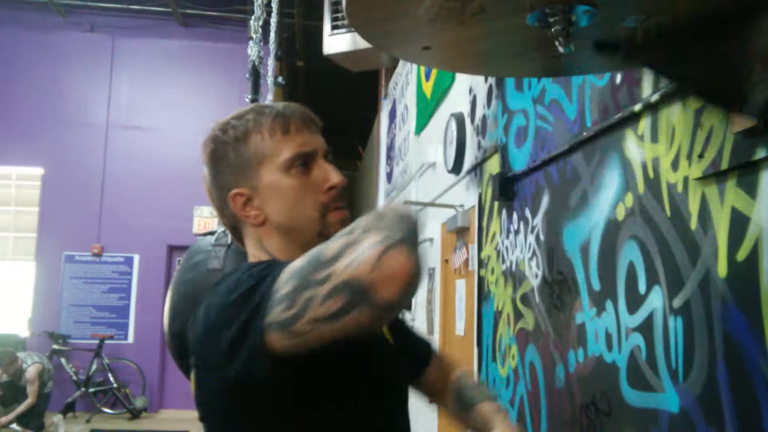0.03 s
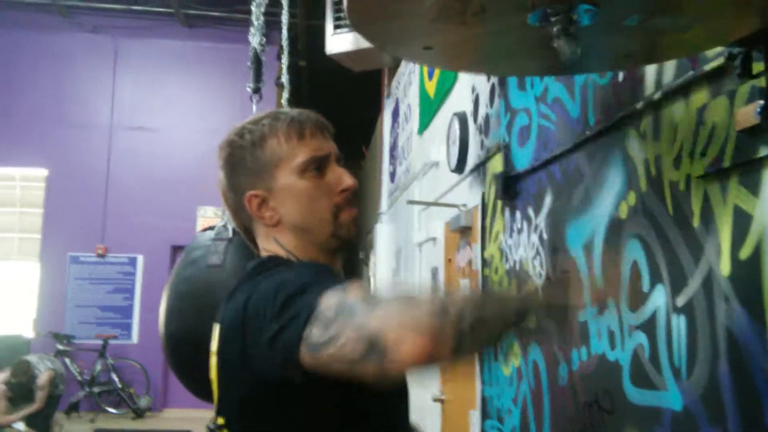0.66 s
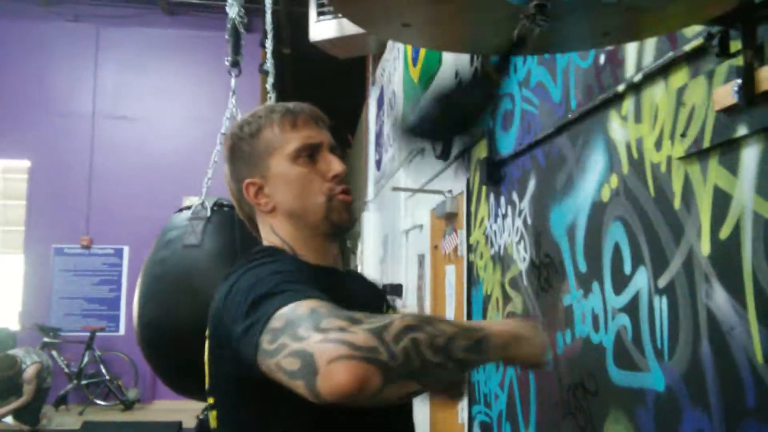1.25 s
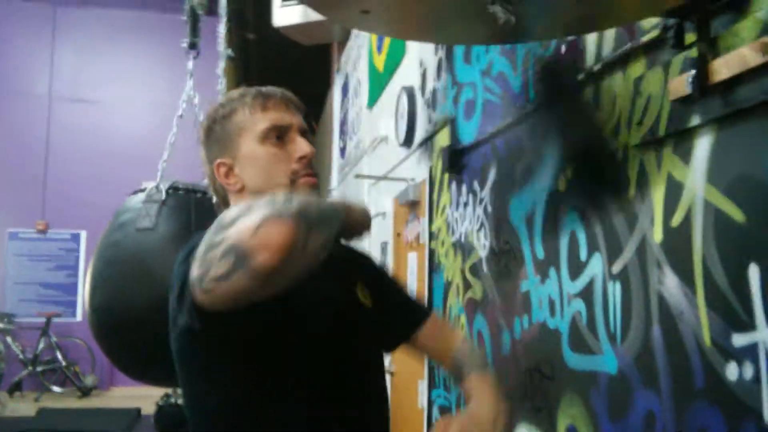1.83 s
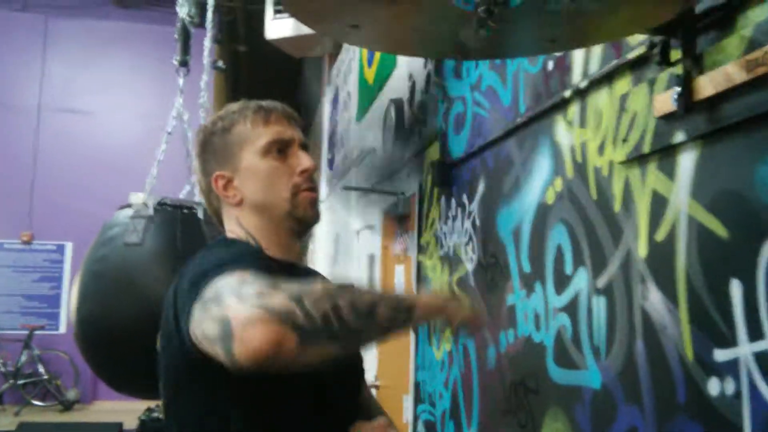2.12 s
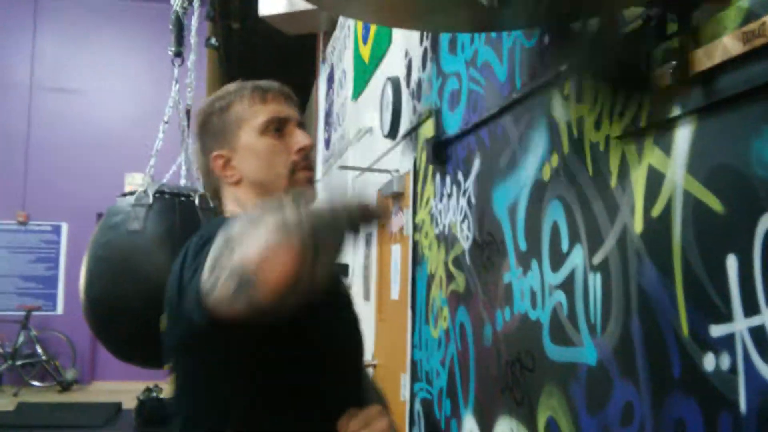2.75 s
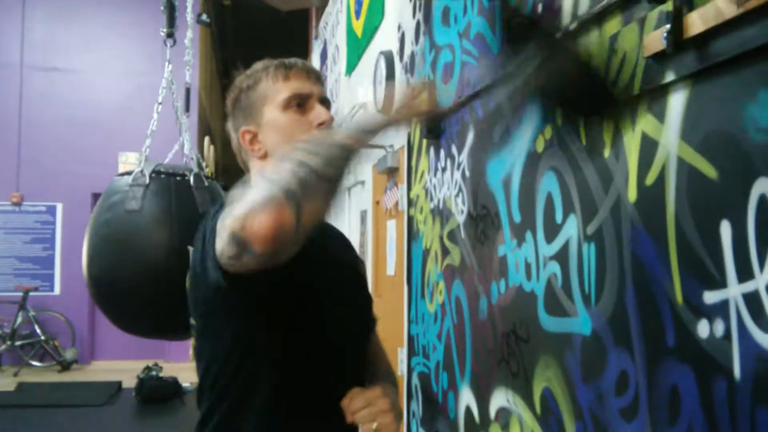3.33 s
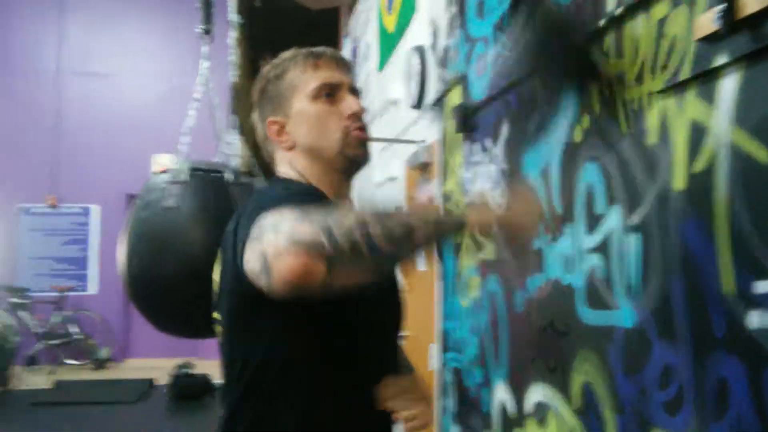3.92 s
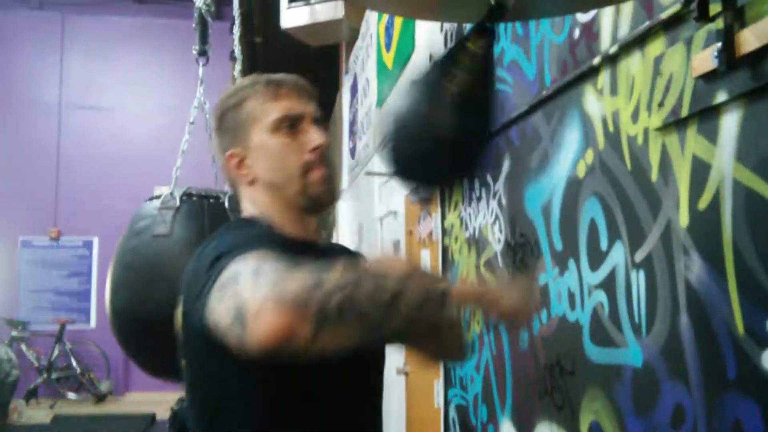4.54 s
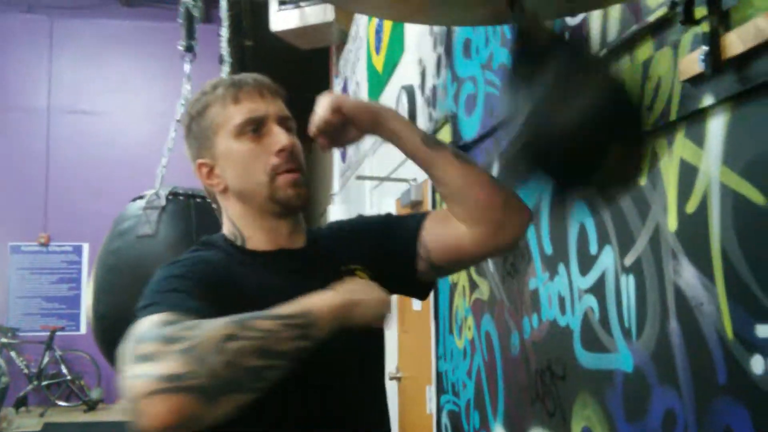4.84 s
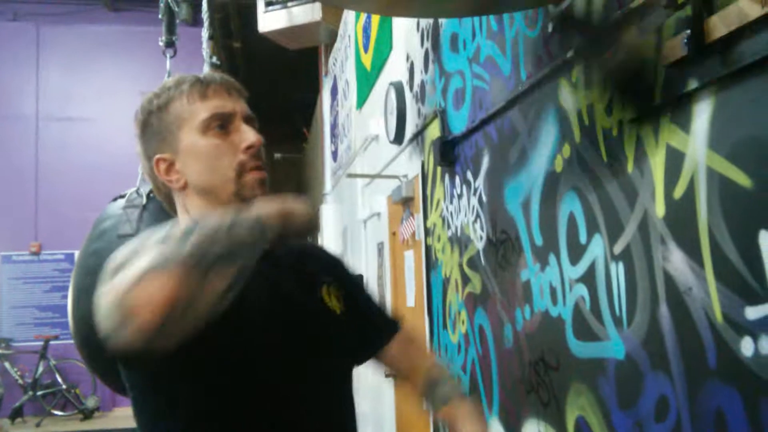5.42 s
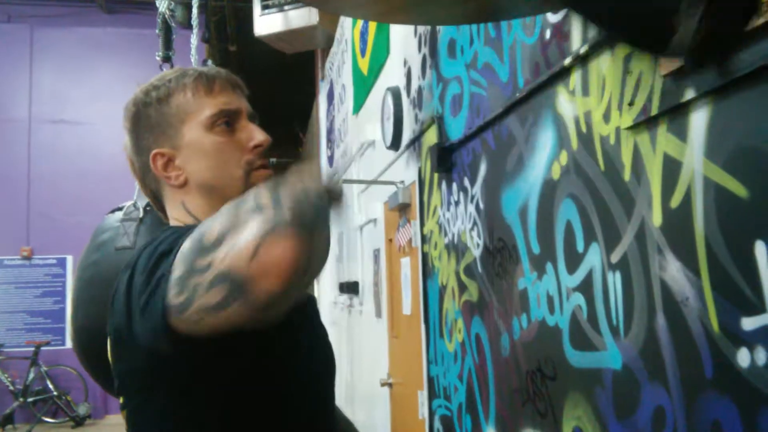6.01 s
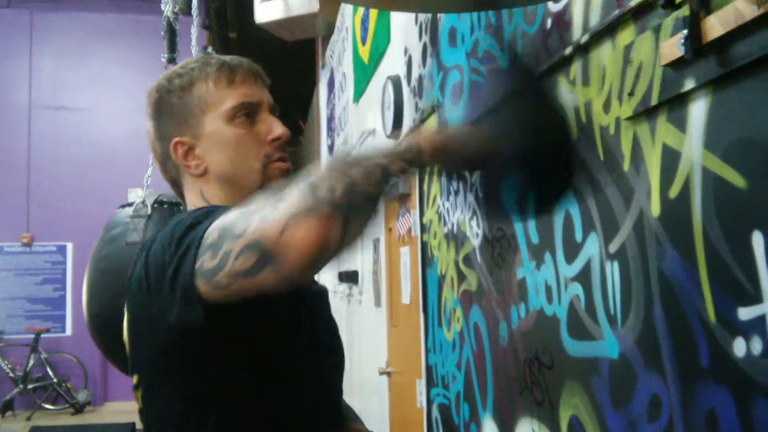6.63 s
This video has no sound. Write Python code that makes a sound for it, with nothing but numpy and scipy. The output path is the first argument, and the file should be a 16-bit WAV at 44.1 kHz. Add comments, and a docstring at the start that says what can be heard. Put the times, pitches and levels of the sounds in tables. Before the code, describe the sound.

Rapid leather slaps and wooden thumps of a speed bag in a gym, its metal swivel clinking and squeaking, with one brief lull.

```python
"""A speed bag is worked about twice a second under its wooden platform in a gym. The fist slaps the
leather, the bag slams into the back of the board, squeaks through on its swivel, rebounds off the front
and taps the back again. Each contact clacks, ticks the steel and booms the board; the fittings buzz on
and the hall rings out over a steady rumble. In the first half the hardest blows choke the microphone.
About four and a half seconds in, the bag swings free for a moment; then the punching picks up again."""
import sys
import numpy as np
from scipy import signal
from scipy.fft import rfft, irfft
from scipy.io import wavfile
from scipy.ndimage import uniform_filter1d

SR = 44100
rng = np.random.default_rng(int(sys.argv[2]) if len(sys.argv) > 2 else 0)


def unload_audio(sound):
    """Save the sound as a 16-bit wav file, at the path given as the first command line argument."""
    columns = np.transpose(np.atleast_2d(sound))
    # keep every value between -1 and 1, then stretch to whole-number steps
    steps = np.round(np.clip(columns, -1, 1) * 32767)
    wavfile.write(sys.argv[1], SR, steps.astype(np.int16))


N = 294147
TIME = np.arange(N) / SR

# Cue sheets for the four contacts of a stroke, each with trims against a usual contact of its kind:
# t/s, stretch of its delays/x, boom/dB, clack/dB, buzz/dB, metal/dB
PUNCHES = [(0.204, 1.1, 3.5, 1, 5, 2), (0.655, 0.98, 1, 2.5, -3, 1), (1.115, 0.97, 2, 3, 6.5, 6.5),
           (1.593, .7, -3, 2, 0, -4), (2.058, 0.99, 2.5, -1.5, 3.5, 0.5), (2.4946, 1.25, -0.5, 3.5, -8, -2),
           (2.958, 0.93, -9, 2, -10, 3), (3.431, 0.83, 1, 0.5, -3, -4.5), (3.905, .75, 0, -1, -5, 1),
           (4.437, .9, -6.5, -1, -19, 1), (5.184, 0.85, -2, 0.5, 0, -1), (5.670, 1.34, -3, 2.5, 3, 5.5),
           (6.188, 1.11, -2, -2.5, 4, 2)]
SLAMS = [(0.248, .7, -0.1, -2.5, 1, 0.5), (0.699, 0.93, 2.3, 1.5, -0.5, 1), (1.159, 1.16, 2.4, 3, 1.5, 1),
         (1.637, 0.85, 0.2, -1.5, -2, -5.5), (2.105, 0.84, 1.1, 2.5, -3, -2),
         (2.538, 1.2, 3.2, 1, 0.5, -1.5), (3.007, 0.92, 2, 1, -0.5, -0.5), (3.477, 1.22, 2.2, 3, 4.5, 4),
         (3.945, 1.05, -2, 3, -6, -3.5), (4.479, 1.23, -1.2, 1, -2.5, -3),
         (5.2325, 0.78, 1.6, -2, -1.5, -8.5), (5.734, 0.79, 0.42, 3.5, 1.5, 3),
         (6.2355, 1.25, 0.74, 0, 1.5, -6)]
REBOUNDS = [(-0.038, 0.96, 2.5, -4, -2, -2.5), (0.403, 1.03, -3, 0, -2.5, 1.5),
            (0.8556, 0.97, -1, -0.5, 1, 1), (1.321, 1.04, 1, 0, -1, 0), (1.793, 1.02, -1, -0.5, -9, -1.5),
            (2.252, 0.98, 2.5, 0, 4.5, 0.5), (2.691, 0.97, -1.5, 0.5, 3, 0), (3.165, 1.08, 0.5, 0, 2.5, -2),
            (3.642, .95, -1.5, -2, 1.5, -1.5), (4.111, 1.5, -6, -11, -15, -10),
            (4.528, .9, -3, -0.5, -11, -13), (5.385, 0.95, -0.5, 0, 0.5, 1), (5.880, 1.63, 0, -2, 2, -4),
            (6.3967, 1.02, 0, 1, 5, -5.5)]
TAPS = [(0.115, 1, -9, -2, -1, 2), (0.5685, 0.97, -5, -1, -4, 3.5), (1.0284, 0.96, -0.5, -0.5, 0, 3),
        (1.496, 0.99, -1, 2.5, 0, 2.5), (1.961, 1, 0, 3, -5, 1), (2.412, 0.94, 1.5, 2.5, 7.5, 1.5),
        (2.861, 1, -1, 1.5, -7, 4), (3.339, 1, 1, 1.5, 7, 0), (3.825, 1, -0.5, -2, 8.5, 1),
        (4.341, 0.9, -4, -6.5, -15, -5.5), (4.722, 1, -9.5, -7, -18, -11),
        (5.029, 0.77, -13, -20, -24, -16.5), (5.542, 0.87, -0.5, 3.5, 4, 0.5),
        (6.086, 0.53, -5, 0, -13, -2.5), (6.575, 0.65, 0, -2, -9, -2)]
# the cue sheet for each kind of contact
CONTACTS = {"punch": PUNCHES, "slam": SLAMS, "rebound": REBOUNDS, "tap": TAPS}
# how each kind shakes the platform: unstretched delay/s, boom/dB, frame buzz/dB, metal sizzle/dB
SHAKES = {"punch": [(0.004, -16.5, -25.5, -60)], "slam": [(0.001, -10, -19, -18)],
          "rebound": [(-0.022, -22.5, -31, -38), (0.002, -15, -26, -22.5)],
          "tap": [(0.001, -23.5, -38.5, -34.5)]}
# its clacks of leather on wood: unstretched delay/s, wooden body/dB, slap/dB, usual spot pitch/Hz
CLACKS = {"punch": [(0, -27, -23, 1920), (0.013, -17, -13.5, 1210)], "slam": [(-0.001, -18.5, -11, 1565),
          (0.045, -19, -18, 1110)], "rebound": [(-0.0245, -19, -10.5, 1700), (-0.001, -15.5, -10, 2520),
          (0.038, -15, -11.5, 2140)], "tap": [(0, -25.5, -19, 2150), (0.022, -27, -27.5, 1150)]}
# its steel contacts in the swivel: unstretched delay/s, level/dB
TICKS = {"punch": [(0, -18), (0.0145, -16.5)], "slam": [(-0.008, -22), (0, -3.5)],
         "rebound": [(-0.045, -21), (-0.022, -8), (0, -8.5), (0.037, -16.5), (0.113, -26)],
         "tap": [(0, -11.5), (0.023, -28)]}
# the hanger knocks and clinks as the bag swings free: t/s, wooden body/dB, slap/dB, f/Hz, steel/dB
HANGER_KNOCKS = [(2.6127, -24, -14, 1880, -30), (3.093, -21.5, -14.5, 1710, -25),
                 (4.047, -23, -19.5, 2020, -31), (4.168, -18.5, -30, 1150, -24),
                 (4.225, -31.5, -33, 1770, -27), (4.258, -44, -44, 1810, -25.5),
                 (4.686, -30, -23.5, 1870, -23), (4.887, -48, -44, 1790, -30), (4.95, -36, -36, 1380, -32),
                 (5.335, -30, -30, 3400, -16), (6.039, -35, -23.5, 2500, -14)]
# swivel squeaks, mostly just before a rebound: t/s, length/s, start f/Hz, end f/Hz, level/dB
SQUEAKS = [(0.208, 0.0092, 3750, 3860, -20.5), (0.339, 0.037, 3196, 3310, -17.5),
           (0.797, 0.027, 3360, 3320, -17), (1.271, 0.037, 2985, 3560, -17), (1.72, 0.024, 3110, 3300, -22),
           (2.197, 0.036, 2910, 3330, -19), (2.647, .023, 2990, 3370, -14),
           (3.103, 0.036, 3400, 2910, -18.5), (3.909, .017, 3955, 4160, -25.5),
           (4.095, .014, 3350, 3470, -20.5), (4.273, 0.026, 1290, 1190, -32),
           (4.721, 0.012, 3560, 3640, -30.5), (4.855, 0.029, 1720, 1860, -36.5),
           (5.322, .018, 3370, 3580, -20), (5.442, 0.035, 3250, 2930, -20),
           (6.346, 0.027, 3260, 3460, -22.5), (6.435, 0.0163, 3460, 3130, -25)]
# the frame left ringing hollowly between strokes: t/s, f/Hz, level/dB, t60/s
HOLLOW_RINGS = [(1.033, 687, -27, 0.24), (1.523, 670, -27, 0.18), (2.884, 685, -28, 0.22),
                (3.71, 573, -24.5, 0.46), (4.365, 673, -19.5, 0.057), (4.722, 668, -19, 0.077)]
# blows that choke the microphone: t/s, hold/s
CHOKES = [(0.253, 0.014), (0.7005, 0.0041), (1.162, 0.00079), (3.0097, 0.013)]
# low modes of platform and bag: f/Hz, level/dB, t60/s
BOARD_MODES = [(55.6, -8.5, 0.26), (75.8, -7, 0.44), (97.4, 3, 0.24), (116, -15.5, 0.11), (138, -5.5, 0.39),
               (168.7, -4, 0.15), (186, -5.5, 0.097), (267, -22, 0.13)]
# resonances of the wooden frame: f/Hz, width/Hz, level/dB
FRAME_MODES = [(160, 62, -2), (284, 188, -4.5), (514, 55, 0), (557, 37, 2.5), (660, 41, 4.5),
               (870, 66, 0.5), (1002, 57, 1), (1245, 118, -4)]
# tone curves of leather slap, steel and room tone: f/Hz, level/dB
SLAP_EQ = [(700, -23), (1200, -9), (1600, 3.5), (2100, 2.5), (2600, 1.5), (3500, 1), (4200, -3),
           (5200, -17.5), (7000, -18), (12000, -12)]
METAL_EQ = [(1500, -18), (4000, -15.5), (5800, -13.5), (7500, -10), (9500, -6), (11700, 1.5), (13500, -3),
            (15500, -9.5), (17000, 1)]
ROOM_TONE_EQ = [(25, -19), (50, 10), (100, 11), (200, -3), (400, -4), (1000, -6.5), (2500, -14.5),
                (5500, -35), (12000, -20), (16000, -32)]
# reverb time of the hall: f/Hz, t60/s
HALL_DECAY = [(60, 0.36), (160, 1), (420, 0.36), (1100, 0.43), (3000, 0.71), (7000, 0.32), (14000, 0.19)]


def shake_cues():
    """Every contact shakes the platform: rows of t/s, boom/dB, frame buzz/dB, metal sizzle/dB."""
    return [(s + stretch * delay, boom_db + boom_trim, frame_db + buzz_trim, sizzle_db + metal_trim)
            for kind, rows in CONTACTS.items() for s, stretch, boom_trim, _, buzz_trim, metal_trim in rows
            for delay, boom_db, frame_db, sizzle_db in SHAKES[kind]]


def boom(level_db, spread_db, detune, attack_s):
    """The soft bag loads the board gradually and rings its low modes, a little differently each hit."""
    out, t = np.zeros(N), TIME[:SR // 3]
    hz, mode_db, t60 = np.transpose(BOARD_MODES)[:, :, None]
    envelope = decay(t, t60) * (1 - np.exp(-t / attack_s))
    for s, db, *_ in shake_cues():
        louder, higher, polarity = rng.standard_normal((3, len(BOARD_MODES), 1))
        gains = np.sign(polarity) * from_db(mode_db + spread_db * louder)
        modes = gains * envelope * np.sin(2 * np.pi * hz * (1 + detune * higher) * t)
        add(out, s, from_db(db + level_db) * unit_rms(modes.sum(axis=0)))
    return out


def shudder(level_db, t60):
    """After each boom the platform goes on rumbling on its brackets."""
    s, db, _, _ = np.transpose(shake_cues())
    rumble = band_noise(110, 195)
    levelled = rumble / np.sqrt(uniform_filter1d(rumble ** 2, size=900) + 1e-12)
    return bursts(s + 0.011, db + level_db, t60=t60, rise=0.014) * levelled


def clack_cues(spread_octaves=0.24):
    """The bag never lands on quite the same spot: rows of t/s, wooden body/dB, slap/dB, f/Hz."""
    cues = [(s + stretch * delay, body_db + trim, slap_db + trim,
             hz * 2 ** (spread_octaves * rng.uniform(-1, 1)))
            for kind, rows in CONTACTS.items() for s, stretch, _, trim, _, _ in rows
            for delay, body_db, slap_db, hz in CLACKS[kind]]
    return cues + [knock[:4] for knock in HANGER_KNOCKS]


def clacks(wood_db, ring_db):
    """Leather lands in a flurry of tiny slaps that knock the frame and ring the struck spot."""
    s, body_db, slap_db, pitch_hz = np.transpose(clack_cues())
    knock = bursts(s - 0.001, body_db + wood_db, t60=0.096, rise=0.00091)
    knock *= chatter(per_s=1400, uneven_db=2.5, patchy_db=6.0)
    slap = bursts(s, slap_db, t60=0.057, rise=0.0014) * chatter(per_s=1500, uneven_db=4.0, patchy_db=4.0)
    out = wooden_frame(knock) + eq(slap, SLAP_EQ)
    for start, db, hz in zip(s, slap_db, pitch_hz):
        add(out, start, from_db(db + ring_db) * spot_ring(hz, width_hz=670, scuffle_t60=0.056))
    return out


def fists(level_db, wood_db, slap_db):
    """The fist sinks into the bag: a softer, longer slap."""
    s, _, _, trim_db, _, _ = np.transpose(PUNCHES)
    force = bursts(s, level_db + trim_db, t60=0.12, rise=0.00051)
    force *= chatter(per_s=800, uneven_db=2.5, patchy_db=1.5)
    return from_db(wood_db) * wooden_frame(force) + from_db(slap_db) * eq(force, SLAP_EQ)


def wooden_frame(force):
    """The frame gives a force its woody body: a few broad resonances of alternating polarity."""
    t = TIME[:4096]
    modes = [(-1) ** k * from_db(db) * width * np.exp(-np.pi * width * t) * np.cos(2 * np.pi * hz * t)
             for k, (hz, width, db) in enumerate(FRAME_MODES)]
    return convolve(force, sum(modes))


def spot_ring(hz, width_hz, scuffle_t60):
    """A short scuffle rings one resonance of the struck spot; peak power 1."""
    t = TIME[:2000]
    force = rng.standard_normal(len(t)) * (1 - np.exp(-t / 0.0007)) * decay(t, scuffle_t60)
    radius = np.exp(-np.pi * width_hz / SR)
    ring = signal.lfilter([1], [1, -2 * radius * np.cos(2 * np.pi * hz / SR), radius ** 2], force)
    return ring / np.sqrt(uniform_filter1d(ring ** 2, size=350).max())


def swivel_ticks(click_db, rattle_db):
    """Contacts and hanger knocks jerk the swivel: steel meets steel in a click and a short rattle."""
    cues = [(s + stretch * delay, db + trim)
            for kind, rows in CONTACTS.items() for s, stretch, *_, trim in rows
            for delay, db in TICKS[kind]]
    s, db = np.transpose(cues + [(s, steel_db) for s, *_, steel_db in HANGER_KNOCKS])
    click = bursts(s, db + click_db, t60=0.003, rise=0.0012)
    rattle = bursts(s, db + rattle_db, t60=0.09, rise=0.00039)
    return eq((click + rattle) * chatter(per_s=3100, uneven_db=5.5, patchy_db=7.5), METAL_EQ)


def buzz(wood_db, slap_db, metal_db):
    """After a blow the shaking board keeps its frame and metal fittings chattering."""
    s, _, frame_db, sizzle_db = np.transpose(shake_cues())
    shake = bursts(s + 0.012, frame_db, t60=0.48, rise=0.02)
    sizzle = bursts(s + 0.015, sizzle_db, t60=0.63, rise=0.02)
    wood = wooden_frame(shake * chatter(per_s=200, uneven_db=6.5, patchy_db=5.0))
    slap = eq(shake * chatter(per_s=87, uneven_db=0.0, patchy_db=12.0), SLAP_EQ)
    metal = eq(sizzle * chatter(per_s=770, uneven_db=1.5, patchy_db=1.5), METAL_EQ)
    return from_db(wood_db) * wood + from_db(slap_db) * slap + from_db(metal_db) * metal


def loose_parts(per_s, knock_db, ping_db):
    """While the board shakes, nuts and links knock and ping at random, each at its own pitch."""
    s, _, frame_db, _ = np.transpose(shake_cues())
    shake, out = bursts(s, frame_db, t60=0.81, rise=0.014), np.zeros(N)
    for when, softness, knock_tune, ping_tune in rng.random((int(per_s * N / SR), 4)):
        knock = from_db(knock_db) * spot_ring(550 * 7 ** knock_tune, width_hz=220, scuffle_t60=0.022)
        ping = from_db(ping_db) * spot_ring(9000 + 6500 * ping_tune, width_hz=470, scuffle_t60=0.0082)
        add(out, when * N / SR, shake[int(when * N)] * from_db(-9 * softness) * (knock + ping))
    return out


def swivel_squeaks(level_db, waver, flutter_db, shrill_db):
    """Stick-slip in the swivel gives short, rough glides and sets a shrill steel mode singing."""
    out = np.zeros(N)
    slip, grip = unit_rms(uniform_filter1d(uniform_filter1d(rng.standard_normal((2, N)), 45), 45))
    for s, length, start_hz, end_hz, db in SQUEAKS:
        progress = np.linspace(0, 1, int(length * SR))
        glide_hz = start_hz + (end_hz - start_hz) * progress
        hz = glide_hz * (1 + waver * slip[int(s * SR):][:len(progress)])
        envelope = from_db(db + level_db) * np.sin(np.pi * progress)
        add(out, s, envelope * np.sin(2 * np.pi * np.cumsum(hz) / SR))
    shrill = np.abs(out) * unit_rms(band_noise(14300, 15700))
    return out * flutter(grip, flutter_db) + from_db(shrill_db) * shrill


def hollow_rings(level_db):
    """Between strokes one mode of the frame swells and dies away."""
    out, t = np.zeros(N), TIME[:SR // 3]
    for s, hz, db, t60 in HOLLOW_RINGS:
        envelope = from_db(db + level_db) * (1 - np.exp(-t / 0.0026)) * decay(t, t60)
        add(out, s, envelope * np.sin(2 * np.pi * hz * t))
    return out


def hall(send, onset_s, swing_hz, paths=3):
    """A diffuse tail, each band dying at its own pace; the moving bag keeps shifting the echo paths."""
    t, tails = TIME[:SR], 0
    edges = np.geomspace(35, 18000, 11)
    for low, high in zip(edges, edges[1:]):
        t60 = at_hz(HALL_DECAY, np.sqrt(low * high))
        tails = tails + band_noise(low, high, (paths, SR)) * decay(t, t60)
    tails *= 1 - np.exp(-(t / onset_s) ** 2)
    swing = 2 * np.pi * swing_hz * TIME
    crossfades = [np.sqrt(2 / paths) * np.cos(swing + np.pi * k / paths) for k in range(paths)]
    return sum(convolve(send * fade, tail) for fade, tail in zip(crossfades, tails))


def room_tone(level_db):
    """The steady low rumble of the hall."""
    return from_db(level_db) * eq(rng.standard_normal(N), ROOM_TONE_EQ)


def bursts(times, levels_db, t60, rise):
    """Force envelope of many contacts: each swells and dies (rise, t60 in s), and their powers add."""
    power, t = np.zeros(N), TIME[:int((t60 + rise) * SR)]
    shape = ((1 - np.exp(-(t / rise) ** 2)) * decay(t, t60)) ** 2
    shape /= shape.max()
    for s, db in zip(times, levels_db):
        add(power, s, from_db(db) ** 2 * shape)
    return np.sqrt(power)


def chatter(per_s, uneven_db, patchy_db):
    """Dense, uneven micro-impacts; the contact point wanders, so the resonances keep changing."""
    spectra = signal.stft(rng.standard_normal(N), nperseg=512)[2]
    patches = uniform_filter1d(rng.standard_normal(spectra.shape), size=3, axis=0)
    patches = unit_rms(uniform_filter1d(patches, size=3, axis=1))
    patches -= uniform_filter1d(patches, size=17, axis=0)  # what one band gains, its neighbours lose
    noise = signal.istft(spectra * flutter(patches, patchy_db), nperseg=512)[1][:N]
    strength = flutter(rng.standard_normal(SR), uneven_db)
    return unit_rms(noise * np.interp(TIME * per_s, np.arange(SR), strength))


def flutter(noise, depth_db):
    """Turn noise into a wobbling gain with its extremes held in."""
    return from_db(depth_db * np.clip(noise, -2, 1.5))


def band_noise(low_hz, high_hz, shape=N):
    """Band-passed white noise."""
    band = signal.butter(2, [low_hz, high_hz], "band", fs=SR, output="sos")
    return signal.sosfilt(band, rng.standard_normal(shape))


def eq(x, curve, size=2048):
    """Shape a sound to a tone curve; minimum phase keeps the attacks free of pre-ring."""
    hz = np.arange(size + 1) * SR / (2 * size)
    cepstrum = irfft(np.log(from_db(at_hz(curve, hz))))
    cepstrum[1:size] *= 2
    cepstrum[size + 1:] = 0
    return convolve(x, irfft(np.exp(rfft(cepstrum))))


def convolve(x, response):
    """Pass a sound through a response scaled to unit energy."""
    return signal.oaconvolve(x, response / np.linalg.norm(response))[:N]


def at_hz(curve, hz):
    """Read a curve on a log-frequency axis."""
    f, value = np.transpose(curve)
    return np.interp(np.log(np.maximum(hz, 1)), np.log(f), value)


def add(out, s, piece):
    """Mix a piece in from time s; what falls outside the scene is dropped."""
    start = int(round(s * SR))
    first, last = max(start, 0), min(start + len(piece), N)
    if last > first:
        out[first:last] += piece[first - start:last - start]


def decay(t, t60):
    """Exponential decay, 60 dB in t60."""
    return np.exp(-np.log(1000) * t / t60)


def from_db(db):
    """Decibels to gain."""
    return 10 ** (np.asarray(db) / 20)


def unit_rms(x):
    """Scale to unit power."""
    return x / np.sqrt(np.mean(x ** 2) + 1e-20)


def scene():
    """The mix: bag and platform up close, the hall and its rumble behind."""
    low_end = boom(level_db=-11.5, spread_db=4.5, detune=0.024, attack_s=0.0011)
    low_end += shudder(level_db=-9.5, t60=0.32)
    clatter = clacks(wood_db=2.0, ring_db=-5.5) + fists(level_db=-22.5, wood_db=3.0, slap_db=0.5)
    clatter += swivel_ticks(click_db=8.0, rattle_db=-4.0)
    clatter += buzz(wood_db=-3.5, slap_db=-1.0, metal_db=1.0)
    clatter += loose_parts(per_s=39, knock_db=-0.5, ping_db=-1.5)
    tones = swivel_squeaks(level_db=4.5, waver=0.0665, flutter_db=5.5, shrill_db=-8.5)
    tones += hollow_rings(level_db=5.0)
    send = low_end + clatter + from_db(0.5) * tones
    reverb = from_db(-12.0) * hall(send, onset_s=0.0083, swing_hz=2)
    return (low_end + clatter + tones + reverb + room_tone(level_db=-37.0))[None]


def choke(x, swing_hz, swing_db, recover_s):
    """At each choke cue the overloaded microphone goes deaf, swings back towards rest and recovers."""
    for s, hold in CHOKES:
        since = np.maximum(TIME - s, 0)
        deaf = (TIME > s) * np.clip(1 - (since - hold) / recover_s, 0, 1)
        swing = from_db(swing_db) * np.cos(2 * np.pi * swing_hz * since) * decay(since, 0.03)
        x = x * from_db(-32.0 * deaf) + swing * deaf
    return x


def record(dry):
    """The microphone chokes and passes no deep bass; peaks are soft-clipped and the top is cut."""
    low_cut_hz, ceiling, high_cut_hz = 42, 0.95, 16100
    x = choke(dry, swing_hz=86, swing_db=-7.0, recover_s=0.0047)
    x = signal.sosfilt(signal.butter(4, low_cut_hz, "high", fs=SR, output="sos"), x)
    x = x / (1 + (x / ceiling) ** 6) ** (1 / 6)
    return signal.fftconvolve(x, signal.firwin(301, high_cut_hz, fs=SR)[None], "same")


dry = scene()
out = record(dry)
unload_audio(out)
```